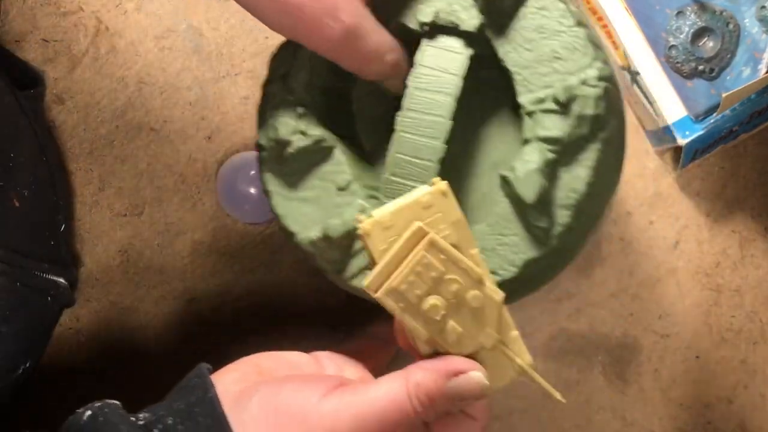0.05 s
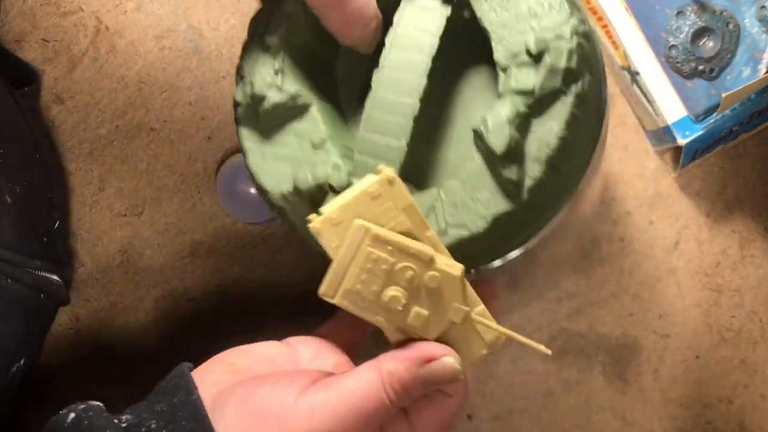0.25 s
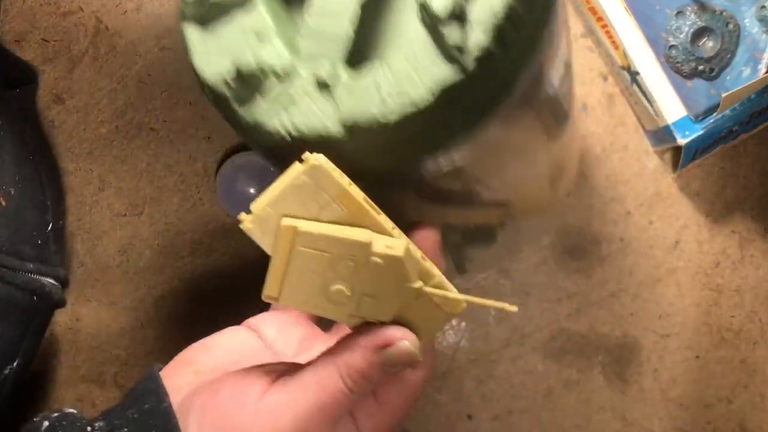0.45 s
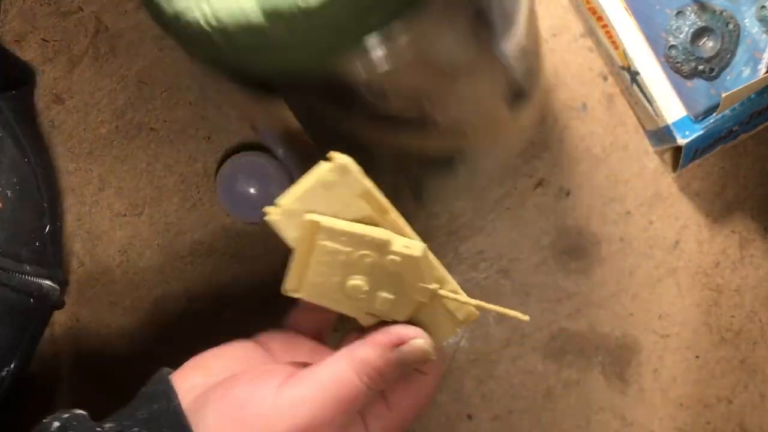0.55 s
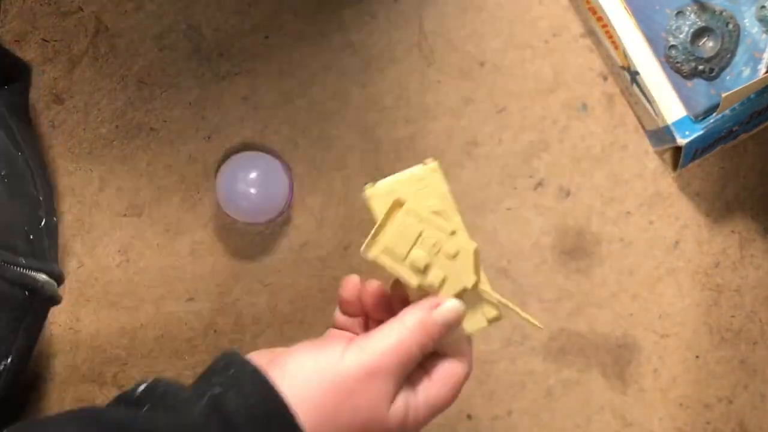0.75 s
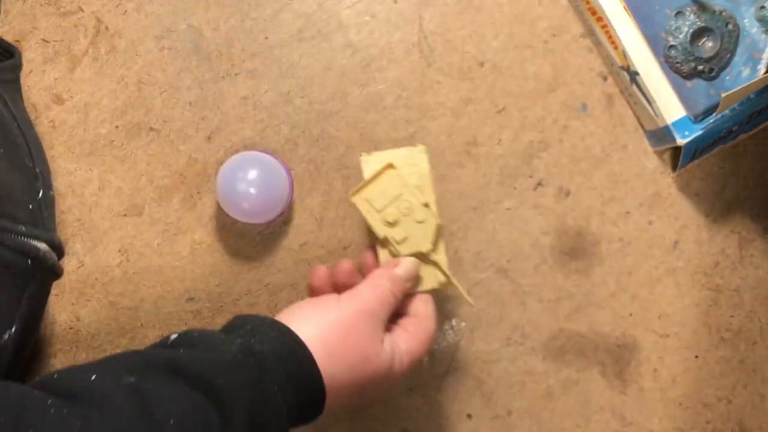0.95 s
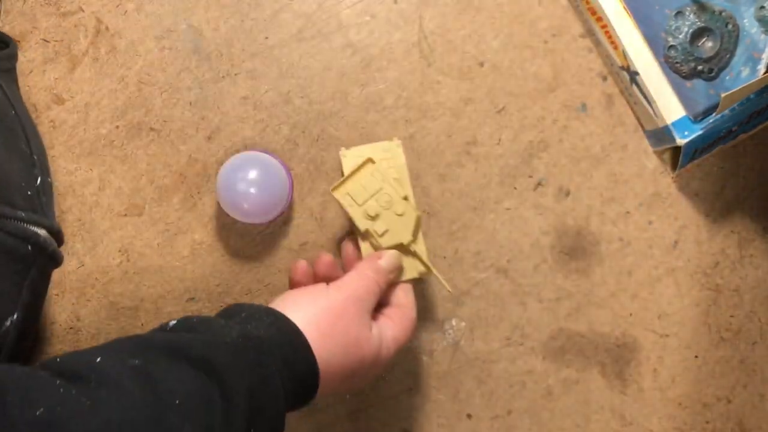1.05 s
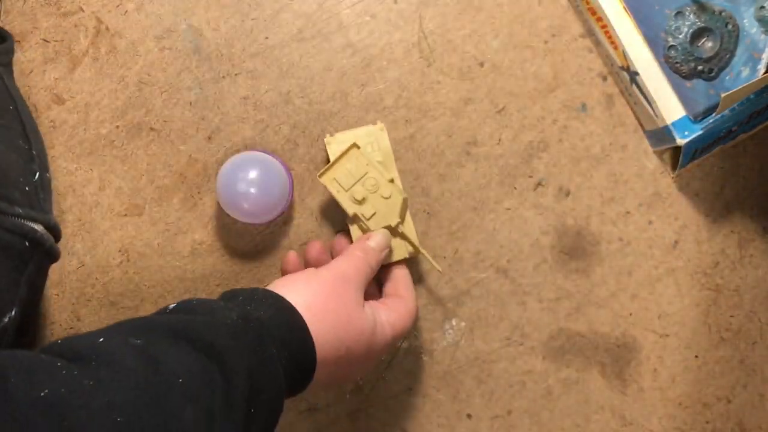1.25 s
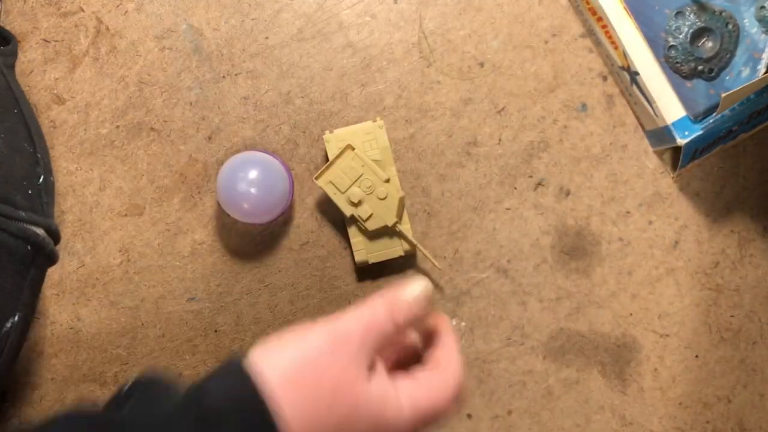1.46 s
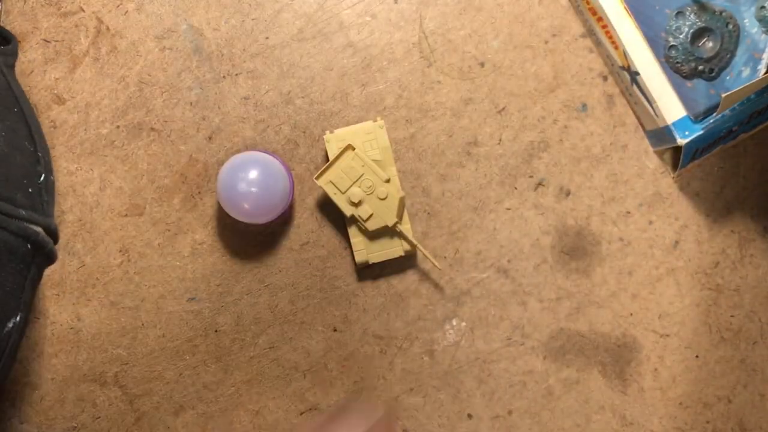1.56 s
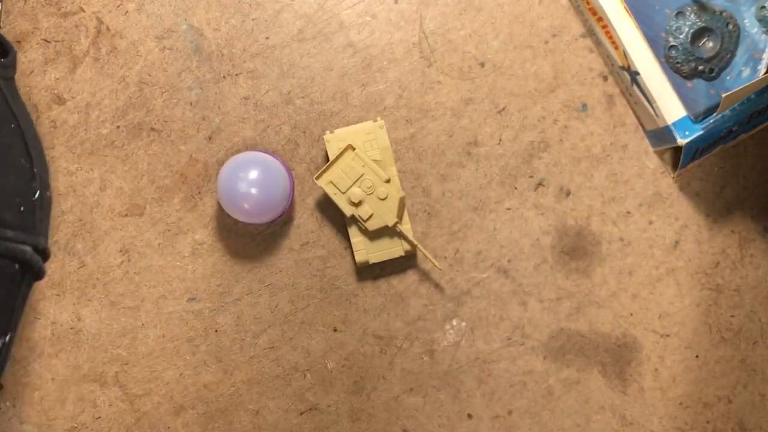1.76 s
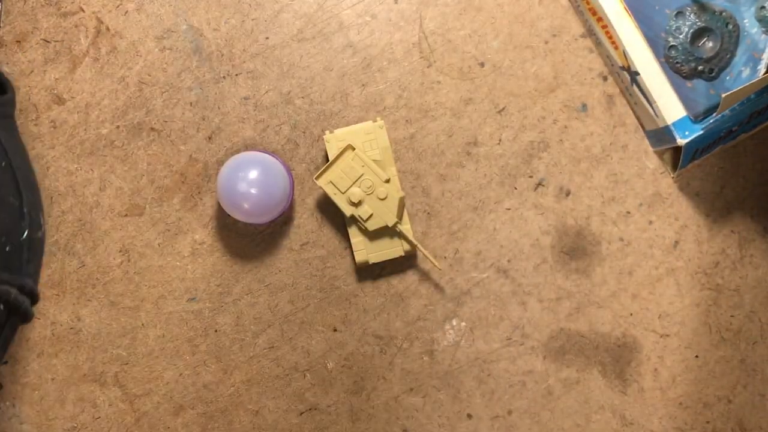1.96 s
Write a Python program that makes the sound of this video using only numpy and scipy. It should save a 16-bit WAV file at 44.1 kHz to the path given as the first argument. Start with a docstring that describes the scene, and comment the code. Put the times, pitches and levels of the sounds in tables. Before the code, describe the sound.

A small plastic toy clicks and scrapes on a wooden board after a tub is knocked.

```python
"""A small hard-plastic toy is set on a wooden board, dragged in two short scrapes and let go with a
double click. Taps and tiny catches ring its hollow body and, weakly, the wood. Before that, a plastic
tub is knocked, gripped with a brief scuff and lifted off, fingers rubbing its wall; a cloth rustle
follows. The board thumps, and at the end a sleeve drags back across it. A phone above the board hears
it all in a small, quiet room with a low hum."""
import sys
import numpy as np
from scipy import signal
from scipy.fft import rfft, irfft
from scipy.io import wavfile
from scipy.ndimage import uniform_filter1d

SR = 44100
rng = np.random.default_rng(int(sys.argv[2]) if len(sys.argv) > 2 else 0)


def transcribe(u):
    """Save the signal u as a 16-bit wav file named by the first command-line argument.

    u: samples, shape (n,) or (channels, n), limited to [-1, 1]; the rate is SR.
    q: integer samples, one column per channel.
    """
    v = np.clip(np.atleast_2d(u).T, -1, 1)
    q = np.round(v * 32767).astype(np.int16)
    wavfile.write(sys.argv[1], SR, q)


N = 88332

# The board's modes, the tones it rings at: (pitch [Hz], level [dB], time to fade by 60 dB [s])
BOARD_MODES = [(64.7, -9.5, 0.3), (119, -6.5, 0.24), (166.5, -4.5, 0.1), (202.2, -0.5, 0.055),
               (245.7, -4, 0.13), (347, 3, 0.041), (600, -2, 0.062), (907, 0.5, 0.042), (1200, -1, 0.049),
               (1730, 0, 0.018)]


def toy():
    """Taps ring the hollow toy; scraping, it sticks and slips, which also hisses and rings the board."""
    # The toy's own tones: (pitch [Hz], level [dB], fade time [s])
    modes = [(686, -14.5, 0.06), (1146, -5, 0.024), (1332, -4, 0.025), (1539, 4.5, 0.0083),
             (1800, 2.5, 0.01), (1947, -24, 0.033), (2047, 3, 0.0051), (2497, -6, 0.024), (3006, 2, 0.0076),
             (4420, -4.5, 0.0048), (6100, -1.5, 0.0034), (6600, -4, 0.0024), (8500, -5.5, 0.0032)]
    # Taps: (time [s], level [dB], favoured pitch [Hz], spread [octaves], crack level [dB])
    taps = [(.9788, -21, 1430, 0.65, -54), (1.0012, -12, 1370, 0.43, -50), (1.0327, -8, 1660, 0.46, -7),
            (1.0548, 1.5, 1930, 0.66, -14), (1.0635, -22, 2380, 0.33, -15), (1.112, -2.5, 2600, 1, -11),
            (1.1192, -8, 2190, 0.81, -9), (1.1225, -3, 2220, 0.81, -29), (1.1335, -5.5, 2500, 1.6, -11),
            (1.138, -4.5, 2520, 1.2, -11), (1.1408, -14, 2100, 1.1, -17), (1.151, -5, 1680, 0.77, -43),
            (1.180, -19, 2070, 0.3, -14), (1.1863, -2, 1625, 0.21, -17), (1.2497, -21.5, 1500, 0.86, -20.5),
            (1.326, -23, 1310, 0.89, -30.5), (1.3805, -5.5, 1860, 0.21, -17.5),
            (1.3895, 5.5, 1980, 0.25, -17), (1.393, -7, 1810, 0.26, -32), (1.4065, -14, 1650, 0.42, -29.5),
            (1.474, -27.5, 1300, 0.23, -34.5), (1.487, -24, 1360, 0.11, -66), (1.502, -35, 1350, .15, -62),
            (1.549, -40, 1020, 0.6, -20), (1.566, -22.5, 2800, 1, -23.5), (1.592, -29, 1920, 0.63, -26),
            (1.7755, -26.5, 1737, 0.093, -30.5), (1.779, -8, 1960, 0.023, -70)]
    # Pressure in each scrape: (time [s], level [dB])
    scrapes = [
        [(0.96, -57.5), (0.98, -33), (0.994, -51.5), (1.002, -30.5), (1.02, -30), (1.064, -15.5), (1.082, -20),
         (1.096, -53), (1.105, -58)],
        [(1.11, -20), (1.113, -21), (1.192, -29.5), (1.204, -42.5), (1.234, -47.5), (1.254, -40.5), (1.27, -59),
         (1.29, -45.5)],
    ]
    # Pressure as the toy rocks under the fingers: (time [s], level [dB])
    rocking = [
        [(1.325, -50), (1.372, -37)],
        [(1.396, -31), (1.42, -50), (1.445, -63)],
    ]
    # Tone of the scraping hiss: (frequency [Hz], level [dB])
    hiss_tone = [(1500, -27), (5000, 5), (10000, -2.5), (16000, -6)]
    catches = grains(per_second=5000)
    press = pressure(scrapes)
    hiss = colour(catches * rng.standard_normal(N), hiss_tone)
    hiss *= press ** 1.645  # the hiss grows faster than the pressure
    body = strike(taps, modes) + ring(press * catches, modes)
    body += ring(pressure(rocking) * catches, modes[:7])
    wood = ring(press * catches, BOARD_MODES)
    return body + undb(5.5) * hiss + undb(-11) * wood


def tub():
    """Knocks ring the plastic tub; fingers sliding on its wall stir only its higher tones."""
    # The tub's own tones: (pitch [Hz], level [dB], fade time [s])
    modes = [(143.4, 3, 0.075), (185, 0.5, 0.05), (371, -8.5, 0.036), (624, -10, 0.064),
             (1102, -6.5, 0.025), (1380, -9, 0.015), (1970, -20, 0.018), (2293, -14, 0.016),
             (2695, -11, 0.013), (3950, -25, 0.016), (5340, 0.5, 0.00098), (6900, -15, 0.0036),
             (9140, -3, 0.00083)]
    # Knocks: (time [s], level [dB], favoured pitch [Hz], spread [octaves], crack level [dB])
    knocks = [(.026, -22, 1390, 1.3, -46), (.029, -17.5, 249, 1.3, -26), (.042, -14, 1220, 0.61, -69),
              (.079, 6, 1870, 0.49, -11), (.081, -6.5, 188, 0.46, -24), (.1, -20, 1150, 0.34, -45),
              (.173, -15, 1900, 0.53, -50), (.228, -17.5, 613, 1.78, -26), (.294, -34, 890, 4.2, -32.5),
              (.496, -18, 405, 0.56, -31), (.498, -22, 2370, 0.36, -27)]
    # Finger pressure in each rub: (time [s], level [dB])
    rubs = [
        [(.024, -39), (.05, -55), (.078, -45.5)],
        [(.085, -33), (.125, -53), (.16, -64)],
        [(.24, -53), (.28, -61), (.31, -45), (.35, -55.5), (.47, -52.5), (.6, -62), (.86, -99)],
    ]
    knocking = strike(knocks, modes)
    friction = pressure(rubs) * grains(per_second=15000, uneven_db=1)
    return knocking + ring(friction, modes[4:])


def scuff_and_sleeve():
    """After a scuff and a rustle, a sleeve drags over the board in patches and sets it rumbling."""
    # A brief scuff as the tub is handled, then a cloth rustle: (time [s], level [dB])
    brushes = [
        [(.12, -61), (.14, -40.5), (.16, -81)],
        [(.73, -89), (.77, -58), (.82, -68.5), (.87, -47), (.92, -76)],
    ]
    # Tone of the scuff and the rustle: (frequency [Hz], level [dB])
    brush_tone = [(1200, -17), (2600, 6.5), (5000, -4.5), (9000, -5.5), (16000, -20)]
    # The drag: (time [s], hiss level [dB], rumble level [dB])
    drag = [(1.45, -62, -65), (1.48, -51, -62), (1.545, -44.5, -76), (1.551, -35, -31), (1.6, -36, -49),
            (1.63, -35, -52), (1.666, -38, -30), (1.7, -45, -47), (1.74, -48.5, -56), (1.78, -51.5, -59),
            (1.82, -62.5, -50.5), (1.847, -54.5, -56), (1.9, -63.5, -79), (2, -61.5, -68)]
    # Tone of cloth sliding on wood: (frequency [Hz], level [dB])
    drag_tone = [(240, -24), (504, -2), (777, -2), (1990, -4.5), (2180, -6.5), (6050, -16), (16000, -29.5)]
    drag = np.array(drag)
    catches = grains(per_second=5000)
    brushing = pressure(brushes) * colour(catches, brush_tone)
    patches = undb(3.5 * wander(per_second=59.78))
    hiss = pressure([drag[:, [0, 1]]]) * patches * colour(catches, drag_tone)
    bumps = pressure([drag[:, [0, 2]]]) * grains(per_second=690, uneven_db=3.9)
    return brushing + hiss + ring(bumps, BOARD_MODES)


def board():
    """Soft blows make the wood thump, with no crack."""
    # Thumps: (time [s], level [dB], favoured pitch [Hz], spread [octaves])
    thumps = [(.045, -15.5, 66, 0.96), (.12, -23, 71, 0.6), (.35, -26, 107, 1.04), (.39, -39, 152, 1.4),
              (.44, -26.5, 66, 1.28), (.977, -14, 134, 1.75), (1.01, -4, 81, 0.3), (1.055, -40, 66, .5),
              (1.14, -18, 170, 1.6), (1.155, -11.5, 66.3, 0.45), (1.25, -31, 316, 1), (1.28, -26, 70, 0.97),
              (1.326, -15, 212, 0.34), (1.39, -21, 129.5, 1.97), (1.48, -28.5, 164, 0.16),
              (1.565, -14, 260, 0.77), (1.575, -15, 66, 0.44), (1.64, -17.5, 66, 0.39),
              (1.7, -26, 67, 0.32), (1.633, -15, 238, 0.48), (1.642, -12.5, 197, 0.3),
              (1.662, -18, 610, 0.86), (1.705, -24.5, 174, 0.66)]
    return strike(thumps, BOARD_MODES)


def room_echo(sound):
    """The nearby walls send back a short, slightly dull echo."""
    fade_s, delay_s, treble_hz = 0.086, 0.003, 4540
    t = np.arange(SR // 3) / SR
    tail = rng.standard_normal(len(t)) * undb(-60 * t / fade_s) * (t > delay_s)
    tail = signal.lfilter(*signal.butter(1, treble_hz, fs=SR), tail)
    return signal.fftconvolve(sound, tail / np.sqrt(np.sum(tail ** 2)))[:N]


def room_noise():
    """The quiet room: a soft, deep rush and a wavering low hum."""
    # Tone of the rush: (frequency [Hz], level [dB])
    rush_tone = [(40, 5), (85, -1), (125, -1.5), (300, -6.5), (600, -10), (1000, -13), (2000, -19),
                 (4000, -25.5), (8000, -29.5), (16000, -30)]
    hum_hz, hum_width_hz = 60, 5.3
    hum_fade_s = np.log(1000) / (np.pi * hum_width_hz)
    hum = unit(mode(rng.standard_normal(N), hum_hz, hum_fade_s))
    rush_db = -52 + 2 * wander(per_second=5.5)
    return undb(rush_db) * colour(rng.standard_normal(N), rush_tone) + undb(-58) * hum


def strike(blows, modes):
    """Each blow rings the modes near its favoured pitch and, given a crack level, adds a dry crack."""
    # Tone of the crack at the contact: (frequency [Hz], level [dB])
    crack_tone = [(300, -2.5), (1000, 1), (3000, -3.5), (8000, -12.5), (16000, -23.5)]
    crack_fade_s, treble_hz, dull_db_per_octave = 0.014, 2900, 5.5
    times, level_db, favoured_hz, spread, *crack_db = np.array(blows).T
    at = (times * SR).astype(int)
    scatter_db = 2.27 * rng.standard_normal((len(blows), len(modes)))  # modes share a blow unevenly
    contact = np.zeros((2, N))
    # Blows pitched under 2 kHz crack with less treble.
    dull_db = dull_db_per_octave * np.minimum(np.log2(favoured_hz / 2000), 0)
    if crack_db:
        contact[:, at] = undb([crack_db[0], crack_db[0] + dull_db])
    low_fade, treble_fade = signal.lfilter([1], [1, -undb(-60 / crack_fade_s / SR)], contact)
    noise = colour(rng.standard_normal(N), crack_tone)
    low = signal.lfilter(*signal.butter(2, treble_hz, fs=SR), noise)
    sound = low_fade * low + treble_fade * (noise - low)
    for k, (hz, db, fade_s) in enumerate(modes):
        off_pitch_db = 15.9 * (np.log2(hz / favoured_hz) / spread) ** 2
        force = np.zeros(N)
        force[at] = undb(level_db + db + scatter_db[:, k] - off_pitch_db)
        sound += mode(force, hz, fade_s)
    return sound / 2


def ring(force, modes):
    """A rough rubbing force shakes each mode at random, and the modes ring on after it."""
    energy = sum(undb(2 * db) * fade_s * SR / (4 * np.log(1000)) for _, db, fade_s in modes)
    tones = (undb(db) * mode(force * rng.standard_normal(N), hz, fade_s) for hz, db, fade_s in modes)
    return sum(tones) / np.sqrt(energy)


def mode(force, hz, fade_s):
    """One ringing tone that swings up briefly after a push, then dies away."""
    decay = np.exp(-np.log(1000) / (max(fade_s, 1e-3) * SR))
    step = 2 * np.pi * hz / SR
    rise_s = min(2.24 / hz, 0.0047)
    swell = np.hanning(int(rise_s * SR) + 3)
    swell = 2 * swell * np.cos(step * np.arange(len(swell))) / swell.sum()
    push = signal.oaconvolve(force, swell)[:N]
    return signal.lfilter([.5, 0, -.5], [1, -2 * decay * np.cos(step), decay * decay], push)


def grains(per_second, uneven_db=0):
    """Tiny catches at random moments, as one surface slides over another."""
    hits = rng.random(N) < per_second / SR
    sizes = undb(uneven_db * np.minimum(rng.exponential(size=N), 4))
    return unit(hits * sizes * rng.choice([-1, 1], N))


def pressure(strokes):
    """Strength over time from strokes of (time [s], level [dB]) points, silent between them."""
    t, strength = np.arange(N) / SR, np.zeros(N)
    for stroke in strokes:
        times, db = np.array(stroke).T
        strength += undb(np.interp(t, times, db, left=-120, right=-120))
    return uniform_filter1d(strength, size=60)


def colour(sound, points):
    """Shape a sound's tone by (frequency [Hz], level [dB]) points, at an average strength of 1."""
    hz, db = np.array(points).T
    frequencies = np.maximum(np.arange(N // 2 + 1) * SR / N, 1)
    gain = undb(np.interp(np.log(frequencies), np.log(hz), db))
    return unit(irfft(rfft(sound) * gain, N))


def wander(per_second):
    """A smooth random drift, about 1 in size."""
    hold = int(SR / per_second)
    steps = np.repeat(rng.standard_normal(N // hold + 1), hold)
    return unit(uniform_filter1d(uniform_filter1d(steps, hold), hold)[:N])


def undb(db):
    """Turn decibels into a gain."""
    return 10 ** (np.asarray(db) / 20)


def unit(x):
    """Scale to an average strength (rms) of 1."""
    return x / np.sqrt(np.mean(x ** 2))


def scene():
    """The sounds at the board, their echo and the quiet room, in one channel."""
    near = toy() + tub() + scuff_and_sleeve() + board()
    return (near + undb(-14) * room_echo(near) + room_noise())[None]


def record(dry):
    """The phone trims the deepest bass and cuts the highest treble."""
    bass_hz, top_hz = 47, 15800
    trimmed = signal.sosfilt(signal.butter(4, bass_hz, "high", fs=SR, output="sos"), dry)
    return signal.sosfilt(signal.ellip(10, .2, 80, top_hz, fs=SR, output="sos"), trimmed)


dry = scene()
out = record(dry)
transcribe(out)
```